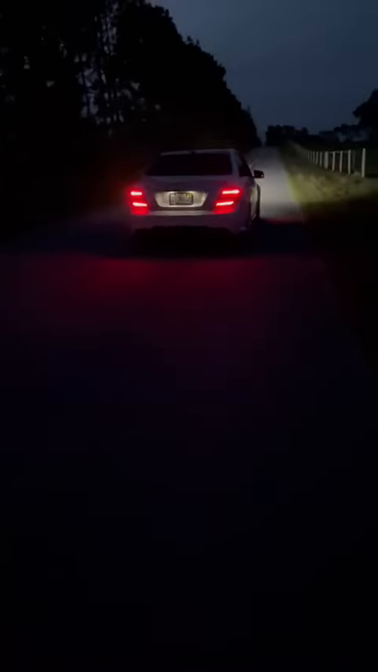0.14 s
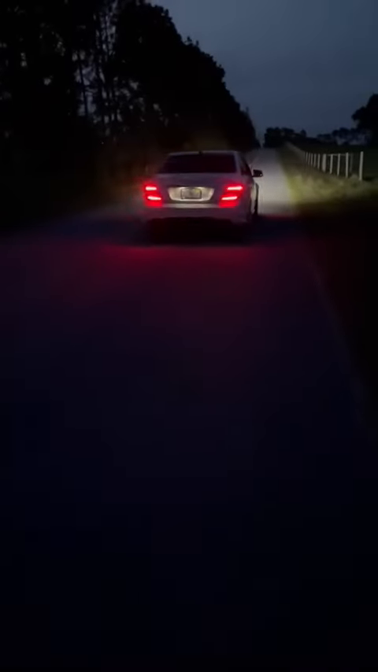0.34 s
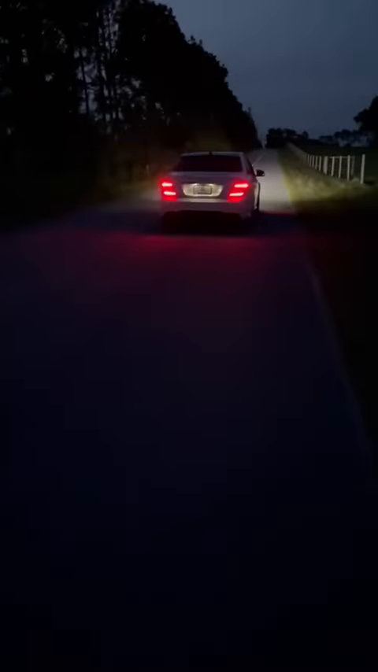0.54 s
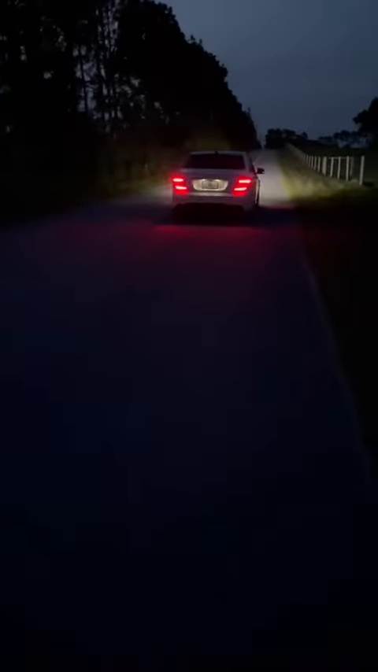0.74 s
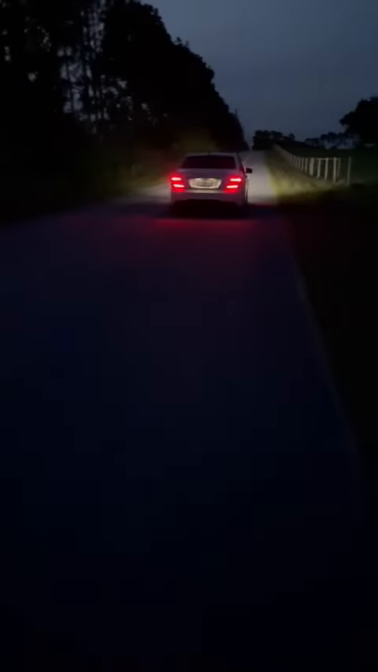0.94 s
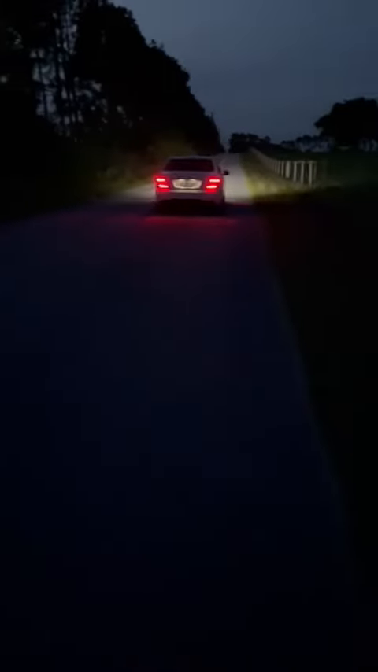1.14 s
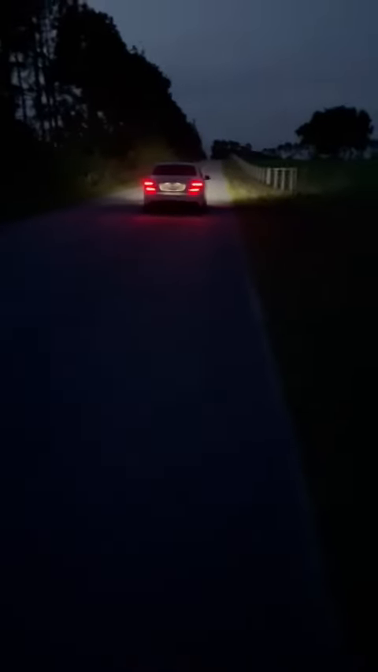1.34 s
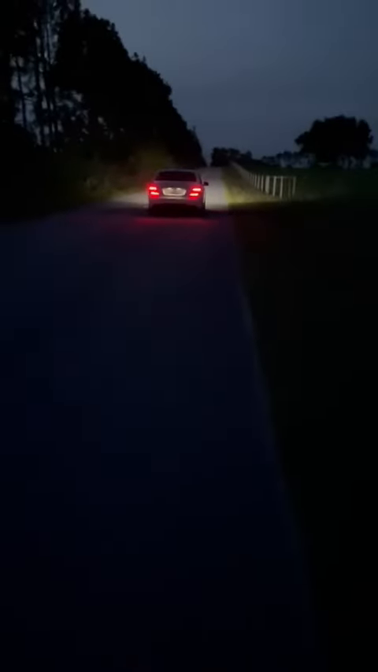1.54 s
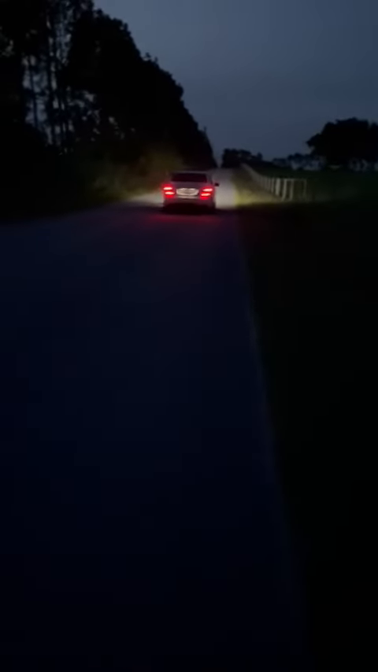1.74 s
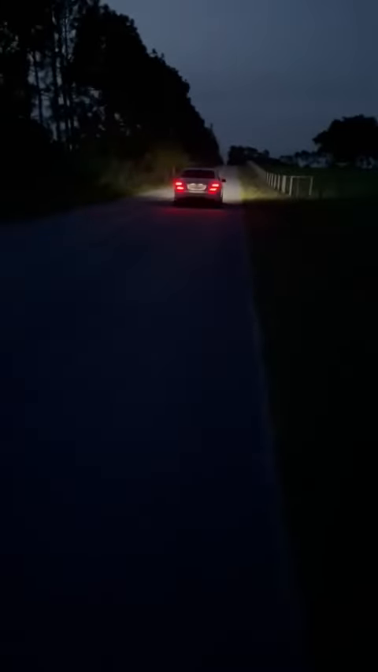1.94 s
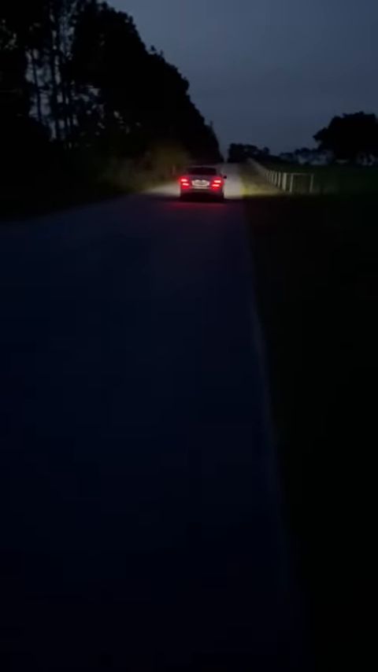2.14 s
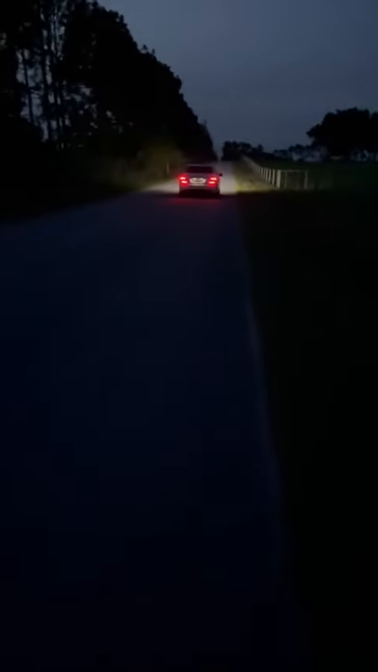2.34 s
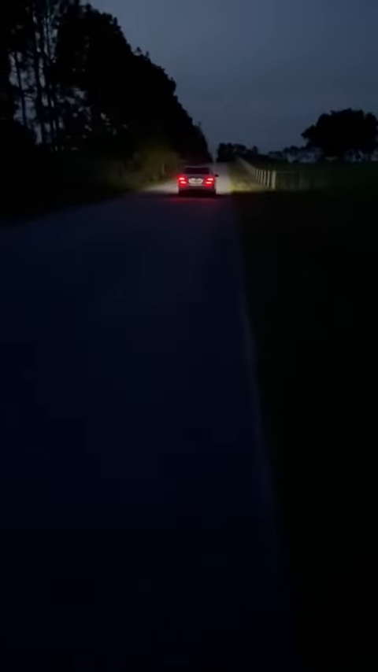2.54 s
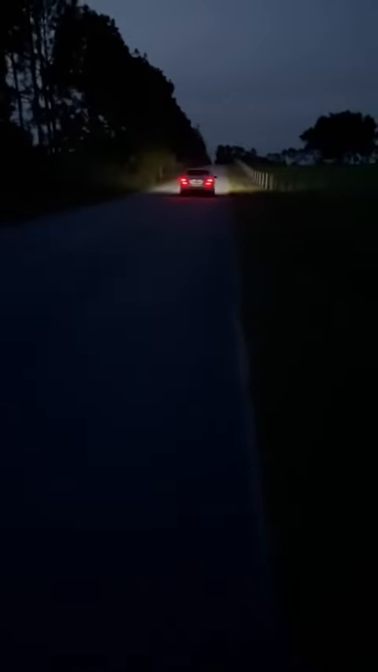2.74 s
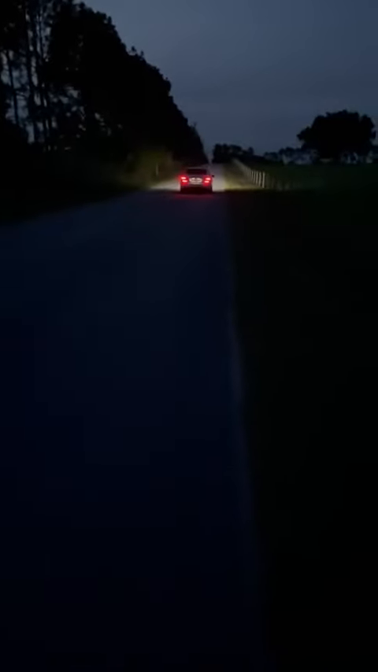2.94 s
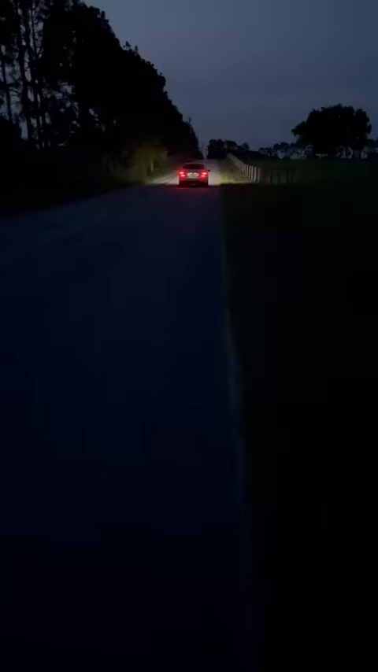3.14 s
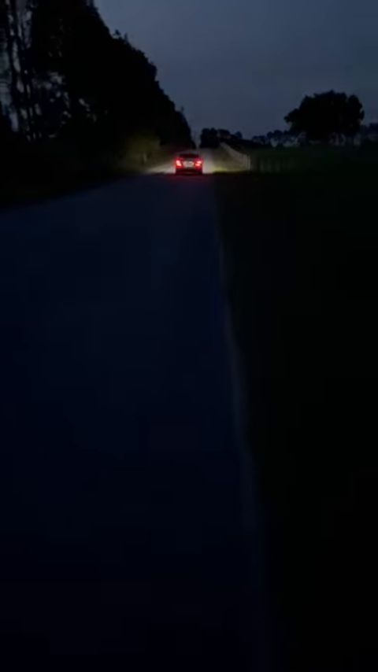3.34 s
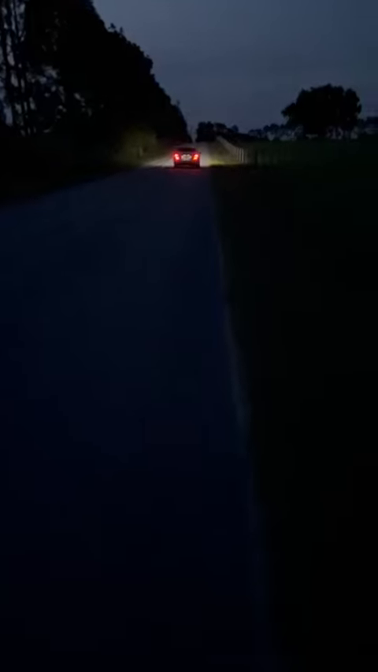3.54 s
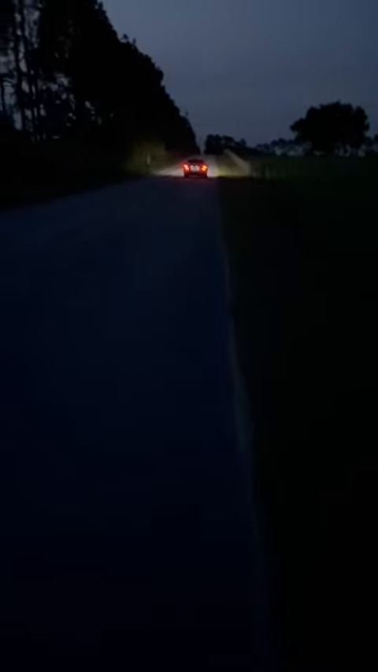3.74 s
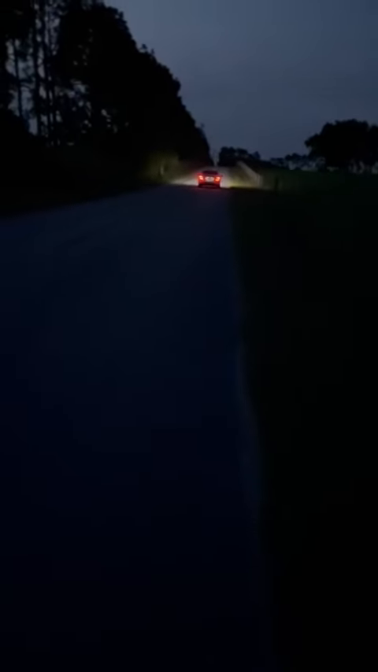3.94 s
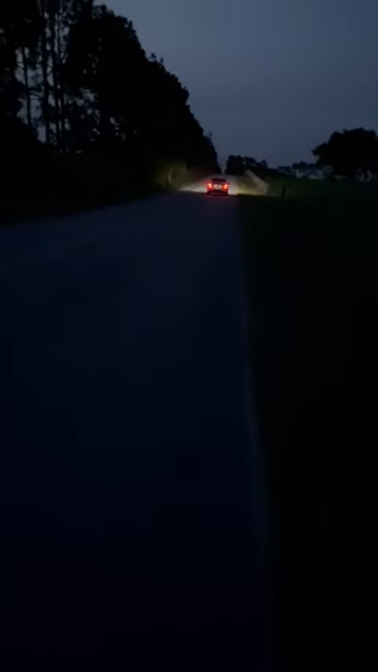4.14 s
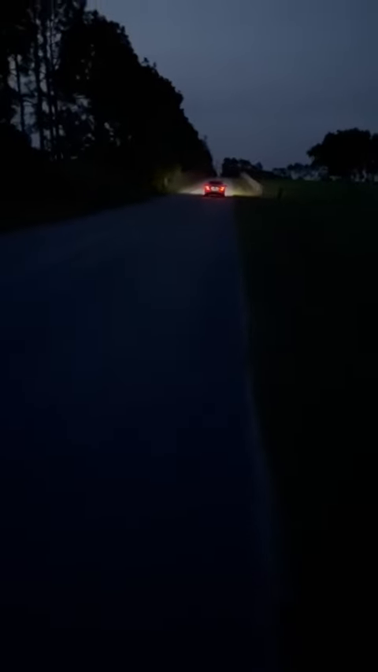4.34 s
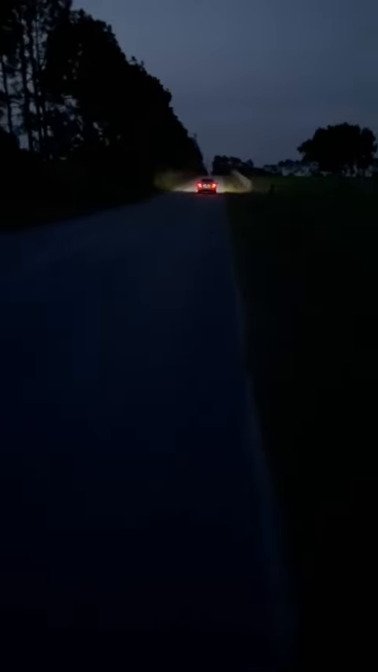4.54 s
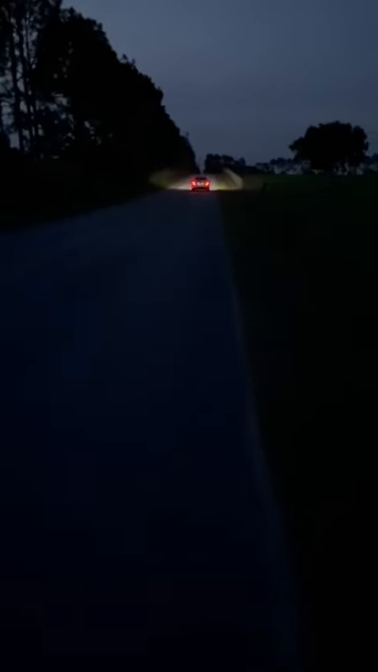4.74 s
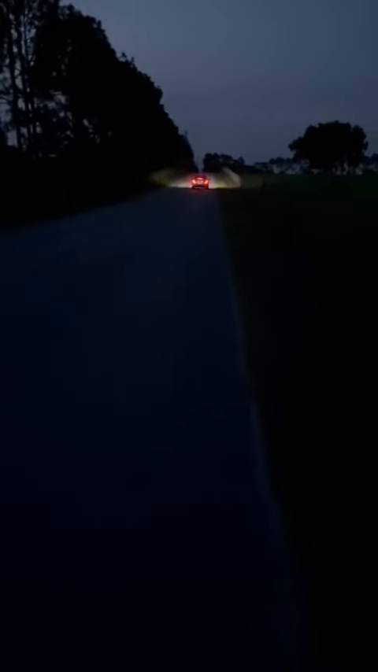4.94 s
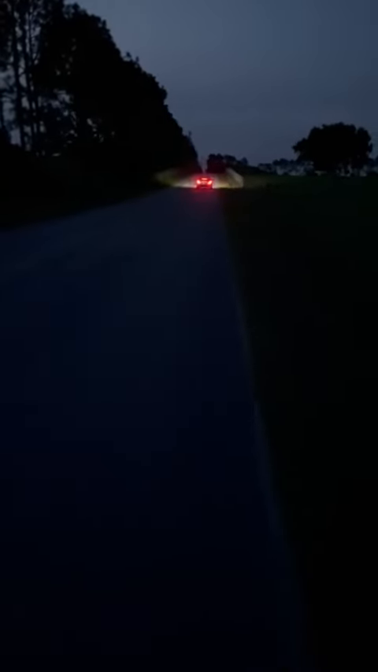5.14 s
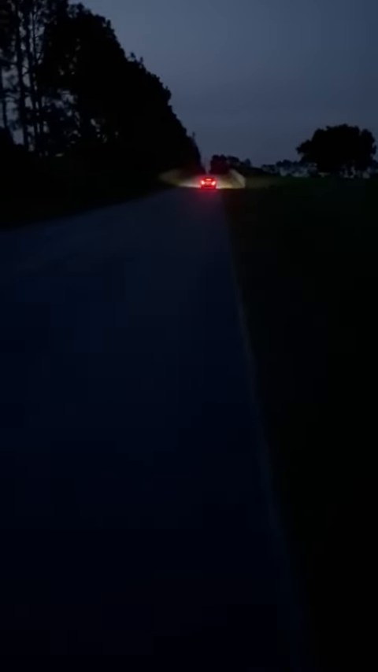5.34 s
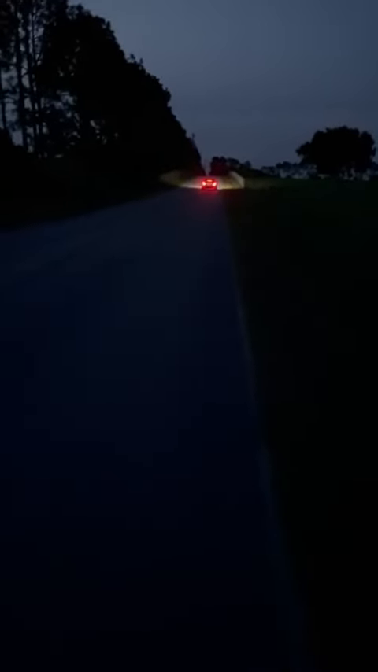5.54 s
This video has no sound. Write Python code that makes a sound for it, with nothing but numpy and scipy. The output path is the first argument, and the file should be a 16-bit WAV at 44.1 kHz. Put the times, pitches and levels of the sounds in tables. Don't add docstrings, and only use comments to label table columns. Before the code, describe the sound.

A six-cylinder car with a loud exhaust pulls away from a roadside phone outdoors. Its deep drone rises, drops at a quick upshift, climbs longer and higher, flares at a second shift, then falls abruptly quiet as the driver lifts off. Tyre hiss follows it and dulls with distance; a few tiny dry ticks sound close to the microphone.

```python
import sys
import numpy as np
from scipy import signal
from scipy.fft import rfft, irfft, next_fast_len
from scipy.io import wavfile
from scipy.ndimage import uniform_filter1d

SR = 44100
rng = np.random.default_rng(int(sys.argv[2]) if len(sys.argv) > 2 else 0)


def linear_from_db(decibels):
    return 10 ** (np.asarray(decibels, float) / 20)


def store_wav(level_fs):
    pcm = np.round(np.clip(np.atleast_2d(level_fs), -1, 1) * 32767)
    wavfile.write(sys.argv[1], SR, pcm.T.astype(np.int16))


N = 247401
T = np.arange(N) / SR

# (time [s], level [dB])
DRONE = [(0, -8.5), (.6, -9), (1.15, -12.5), (2.1, -11.5), (2.5, -14.5), (3.0, -19), (3.4, -22.5),
         (3.62, -22.5), (3.92, -17), (4.45, -17), (4.68, -23), (4.86, -26.5), (4.97, -33.5), (5.03, -42.5),
         (5.15, -42), (5.25, -40), (5.36, -36.5), (5.61, -38)]
# (time [s], level [dB])
LOAD = [(0, -3.5), (.55, -1), (1.15, -1.5), (1.75, -2), (2.1, 4), (2.6, 5.5), (3.3, -1), (3.75, 0),
        (4.05, -6.5), (4.5, -3), (4.75, -25), (5.0, -34), (5.61, -38)]
# (frequency [Hz], left leads by [rad], left minus right [dB],
# likeness of noise [0-1])
PORT_POINTS = [(60, 0, 0, .9), (170, .02, .1, .95), (340, .2, 0, .9), (520, 1.4, 4, .9), (700, 2.1, 8, .88),
               (860, 3.1, 8, .85), (1040, 4.2, 8, .88), (1400, 5.6, 4.5, .9), (2000, 6.0, 2.8, .92),
               (2900, 6.28, -1, .88), (3500, 6.15, .5, .75), (4300, 6.5, -4, .64), (4900, 8.8, -2.5, .25),
               (5500, 7.5, .7, .4), (6100, 7.0, .8, .65), (8300, 8.9, .1, .7), (9000, 3 * np.pi, 0, 1),
             (11600, 3 * np.pi, 0, 1), (12300, 10.4, 0, .3), (13500, 4 * np.pi, 0, 1)]
PORTS = PORT_POINTS


def evened(x):
    return x / np.sqrt(np.mean(x ** 2) + 1e-20)


def read(points, hz, column=1):
    table = np.transpose(points)
    return np.interp(np.log(hz + 1), np.log(table[0] + 1), table[column])


def curve(points):
    return np.interp(T, *np.transpose(points))


def swell(at_s, length_s):
    return np.exp(-((T - at_s) / length_s) ** 2)


def tent(top_s, rise, fall):
    return -np.maximum(rise * (top_s - T), fall * (T - top_s))


def ramp(at_s, length_s):
    return np.clip((T - at_s) / length_s + .5, 0, 1)


def wander(per_s):
    rate = 400
    steps = signal.lfilter([1], [1, -np.exp(-2 * np.pi * per_s / rate)], rng.standard_normal(2700))
    settled = steps[200:]
    return np.interp(T, np.arange(2500) / rate, evened(settled))


def hump(hz, centre_hz, octaves):
    return np.exp(-(np.log2((hz + 1) / centre_hz) / octaves) ** 2)


def likeness(hz):
    return read(PORTS, hz, column=3)


def noise(spectrum, same, patchy_db, dull_db=0 * T, dip_db=0 * T):
    hop, frames = 256, N // 256 + 5
    hz = np.fft.rfftfreq(1024, 1 / SR)
    column_hz = hz[:, None]
    s = np.arange(frames) * hop / SR
    a, b, c, d, patches = rng.standard_normal((frames, 513, 5)).T
    patches = uniform_filter1d(patches, size=8, axis=0)
    patches = evened(uniform_filter1d(patches, size=24, axis=1))
    same = np.clip(same(hz), -1, 1)[:, None]
    left = a + 1j * b
    right = same * left + np.sqrt(1 - same ** 2) * (c + 1j * d)

    level_db = read(spectrum, hz)[:, None] + patchy_db * patches
    level_db -= np.interp(s, T, dull_db) * np.log2(np.maximum(column_hz / 1500, 1))
    level_db -= np.interp(s, T, dip_db) * hump(column_hz, 1740, .25)
    notch_db = 3 * (1 - np.exp(-((s - 3.1) / .9) ** 4))
    level_db -= notch_db * hump(column_hz, 846 + 37 * s, 0.089)
    level_db -= 2.05 * np.outer((hz / 10000) ** 3, s)
    level_db -= 3.5 * hump(column_hz, 1435, 0.063)
    spectra = np.array([left, right]) * linear_from_db(level_db)
    return evened(signal.istft(spectra, nperseg=1024, noverlap=768)[1][:, :N])


def engine():
    # (time [s], firing rate [Hz])
    revs = [(0, 136.4), (.15, 142.7), (.35, 147.5), (.63, 151.3), (.8, 134.3), (.97, 117), (1.15, 114),
            (1.6, 123.1), (2.1, 142.1), (2.5, 156), (2.9, 167.9), (3.3, 174.7), (3.56, 181.2), (3.85, 149),
            (4.13, 129.3), (4.4, 133), (4.9, 131.4), (5.61, 131)]
    hz = uniform_filter1d(curve(revs), size=4000)
    return hz, np.cumsum(hz) / SR


def pipe(hz, humps, order=1):
    grid = np.arange(2000.)
    power = sum(linear_from_db(2 * db) / (1 + (2 * (grid - f) / width) ** 2) ** order for f, width, db in humps)
    return np.interp(hz, grid, np.sqrt(power))


def exhaust(hz, turns):
    # (frequency [Hz], width [Hz], level [dB])
    tail_pipe = [(156, 76, 4.5), (504, 140, -5), (634, 150, 7), (760, 40, -18.5), (825, 19, 4),
                 (1000, 200, -23)]
    # (frequency [Hz], width [Hz], level [dB])
    muffler = [(227, 35, -13), (291.5, 94, -26), (350, 100, -27), (425.8, 30, -29), (508, 50, -24),
               (633, 58.4, -10.5), (706, 100, -23.5)]
    # (order [firing rates], level [dB], loss to the ground echo [dB/s])
    clean_orders = [(2, 1, 2), (3, -1, 0.76), (4, -7, 2.87)]
    # (place [sixths], level [dB])
    uneven = [(1, -18.5), (2, -17.5), (3, 0.5), (4, -17), (5, -13)]
    # (order [firing rates], level [dB])
    halves = [(1.5, 0.5), (2.5, -5), (3.5, -18.5), (4.5, -17.5), (5.5, -21.5), (8.5, -31.5)]
    # (order [firing rates], slope [dB/s])
    half_slopes = [(1.5, 0), (2.5, -2), (3.5, 3.5), (8.5, 1)]

    drone_db, load_db = curve(DRONE), curve(LOAD)
    snarl_db = 7 * swell(3.75, 0.21)
    clean = [linear_from_db(drone_db)]
    for order, db, loss in clean_orders:
        clean_db = load_db + (order > 2) * snarl_db + db - loss * T
        clean.append(linear_from_db(clean_db) * pipe(order * hz, muffler, order=2))
    rasp_db = -36 + 2 * T + snarl_db + load_db + np.maximum(-abs(hz - 147.8), -14.5)
    uneven_db = drone_db - 17 - 1.4 * T
    smooth_db = 0.92 * np.maximum(133.3 - hz, 0)
    lugging = np.clip((142 - hz) / 10, 0, 1)

    out, drift = np.zeros(N), np.sin(1.3 * T)
    for sixth in range(3, 52):
        order, place = sixth / 6, sixth % 6
        if sixth == 3:
            flutter = .3
            gain = linear_from_db(drone_db - 24.5 + np.maximum(hz - 150, 0) / 6)
        elif place == 3:
            flutter = .15
            half_db = np.interp(order, *np.transpose(halves))
            half_db = half_db + T * np.interp(order, *np.transpose(half_slopes))
            gain = linear_from_db(uneven_db - smooth_db * 1.5 / order + half_db)
        elif place:
            flutter = .3
            sixth_db = uneven[place - 1][1] - 3 + 1.5 * T
            gain = linear_from_db(uneven_db - smooth_db / 2 + sixth_db) * pipe(order * hz, tail_pipe)
        elif order < 5:
            flutter = .004 * order ** 2 + .035
            gain = clean[sixth // 6 - 1]
        else:
            flutter = .13
            gain = linear_from_db(rasp_db - 2.5 * (order - 5)) * pipe(order * hz, tail_pipe)
        start = np.pi * (order - 1) if not place else 2 * np.pi * rng.random()
        sway = flutter * wander(6) + .5 * (order - 1) * drift
        sway += .6 * lugging * (order > 3.6) * wander(25)
        wave = np.sqrt(2) * np.cos(2 * np.pi * order * turns + start + sway)
        out += gain * (1 + flutter * wander(6)) * wave
    return out


def launch():
    return np.exp(-T / 0.047)


def roar(turns):
    # (frequency [Hz], level [dB per Hz])
    roar_spectrum = [(25, -44.5), (45, -27), (65, -8.5), (110, 9), (200, -2), (300, -1), (400, -24.5),
                     (600, -37)]
    level_db = -30 + 0.37 * curve(DRONE) + 0.12 * curve(LOAD) + launch()
    puff = 1 + 0.14 * np.cos(2 * np.pi * turns)
    return linear_from_db(level_db) * puff * noise(roar_spectrum, likeness, 2.1)


def tyre_hiss(turns):
    # (frequency [Hz], level [dB per Hz])
    hiss_spectrum = [(350, -36.5), (500, -9.5), (750, 3.5), (1000, 3.5), (1250, -2.5), (1550, -4),
                     (1900, -9.5), (3000, -18), (4200, -27.5), (5200, -32.5), (8000, -34), (11000, -52.5),
                     (14000, -62.5), (15600, -65.5)]
    level_db = -29 + tent(2.64, rise=2, fall=3) + 0.86 * launch()
    dull_db = np.minimum(-5 + 3 * T, 4) - np.exp(-T / 0.22)
    dull_db += 0.68 * wander(9.1)
    dip_db = 1.9 + 10.5 * swell(3.48, 0.5)
    puff = 1 + 0.035 * np.cos(2 * np.pi * turns)
    return linear_from_db(level_db) * puff * noise(hiss_spectrum, likeness, 1.7, dull_db, dip_db)


def breeze():
    # (frequency [Hz], level [dB per Hz])
    air_spectrum = [(25, -32), (50, -14.5), (90, -4), (140, -10.5), (200, -13), (330, -28.5), (650, -27),
                    (1500, -44.5), (4400, -42.5), (5200, -55)]
    # (frequency [Hz], likeness of the ports [-1 to 1])
    air_likeness = [(40, .1), (130, -.4), (220, -.8), (380, -.92), (650, -.4), (1500, .85), (9000, 1)]
    return linear_from_db(-44) * noise(air_spectrum, lambda hz: read(air_likeness, hz), 2.5)


def insects():
    # (frequency [Hz], level [dB])
    singers = [(11854, -90.5), (12150, -94.5)]
    out = np.zeros(N)
    for hz, db in singers:
        out += linear_from_db(db + 7 + 2 * wander(8)) * np.sqrt(2) * np.sin(2 * np.pi * hz * T)
    return out


def burble(turns):
    # (frequency [Hz], level [dB per Hz])
    burble_spectrum = [(400, -21.5), (470, -1), (530, 12.5), (620, -1.5), (800, 10), (950, -7.5),
                       (1300, -32.5)]
    valve = ramp(2.1, 0.39) - 1.2 * ramp(4.75, 0.24)
    level_db = -50 + 17.5 * valve + 3.3 * launch()
    puff = 1 + .45 * np.cos(2 * np.pi * turns)
    return linear_from_db(level_db) * puff * noise(burble_spectrum, likeness, 2)


def tree_echo(turns):
    level_db = np.maximum(-28.5 + tent(3.64, rise=10.5, fall=4.5), -46.5)
    waver = wander(4) * np.cos(2 * np.pi * turns) + wander(4) * np.sin(2 * np.pi * turns)
    return linear_from_db(level_db) * np.outer([1, -1], waver)


def ticks():
    # (time [s], peak level [dB], ring [Hz], knock level [dB])
    scrapes = [
        (3.6372, -42.5, 5640, 3.5),
        (4.235, -49, 4525, -9.5),
        (4.8308, -50, 5800, -10.5),
        (4.892, -50.5, 5440, -9),
    ]
    out, t = np.zeros(N), np.arange(1500) / SR
    shape = np.minimum(t / 0.00091, 1) / (1 + (t / 0.011) ** 6)
    for s, db, hz, knock_db in scrapes:
        burst = rng.standard_normal(1500)
        ring = signal.lfilter(*signal.iirpeak(hz, hz / 1500, SR), burst)
        spray = signal.lfilter(*signal.iirpeak(7500, .6, SR), burst[::-1])
        knock = signal.lfilter(*signal.iirpeak(2500, .7, SR), burst)
        layers = evened(ring) + linear_from_db(-2) * evened(spray) + linear_from_db(knock_db) * evened(knock)
        at = round(s * SR)
        out[at:at + len(t)] += linear_from_db(db - 9.5) * shape * layers
    return out


def scene():
    hz, turns = engine()
    car = exhaust(hz, turns) + roar(turns) + tyre_hiss(turns) + burble(turns)
    return car + breeze() + insects() + tree_echo(turns) + ticks()


def band_limit(x):
    return signal.sosfilt(signal.butter(12, 15750, fs=SR, output="sos"), x)


def record(dry):
    size, margin = next_fast_len(N + SR), 4096
    hz = np.fft.rfftfreq(size, 1 / SR)
    lead, shade_db = read(PORTS, hz), read(PORTS, hz, column=2)
    hand = 1 - 0.27 * np.exp(-2j * np.pi * hz / 750 - (hz / 4000) ** 4) * (hz > 250)
    port = linear_from_db(-shade_db) * np.exp(-1j * lead) * hand
    padded = np.pad(dry[1], (margin, margin), mode="reflect", reflect_type="odd")
    right = irfft(rfft(padded, size) * port, size)[margin:margin + N]
    mix = np.array([dry[0], right])
    return band_limit(mix)


dry = scene()
out = record(dry)
store_wav(out)
```